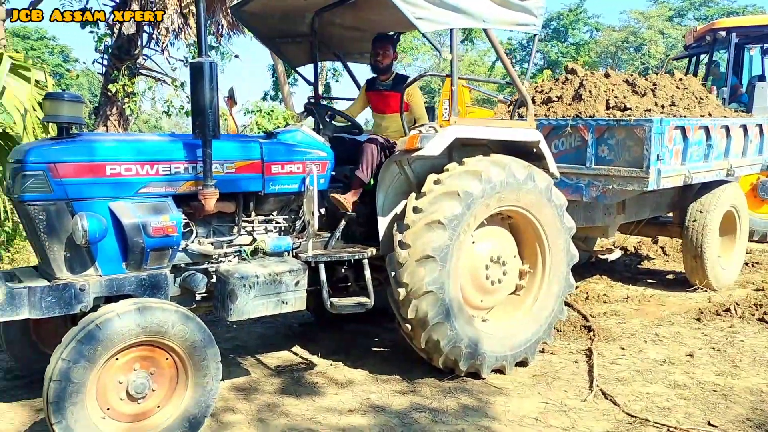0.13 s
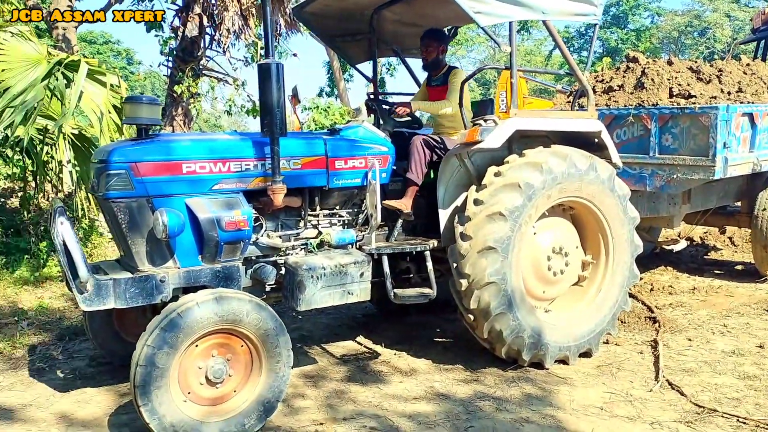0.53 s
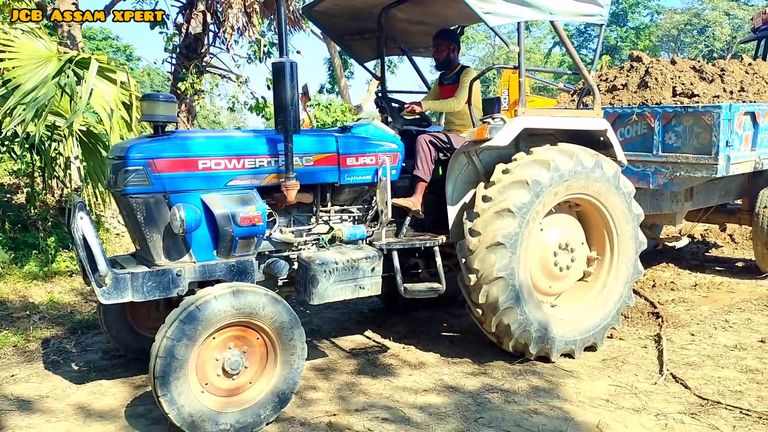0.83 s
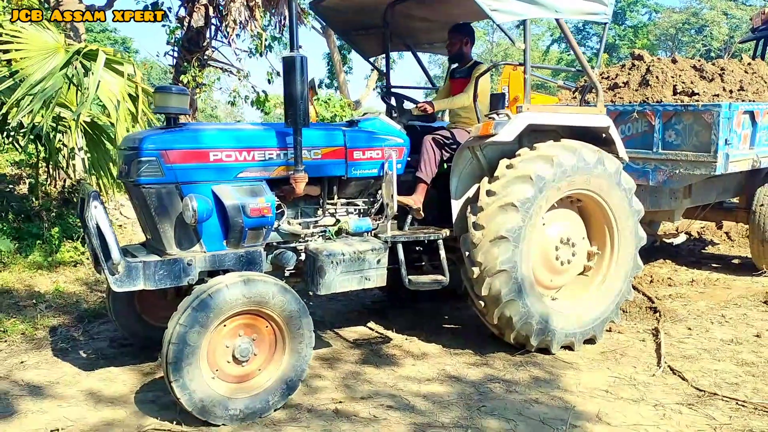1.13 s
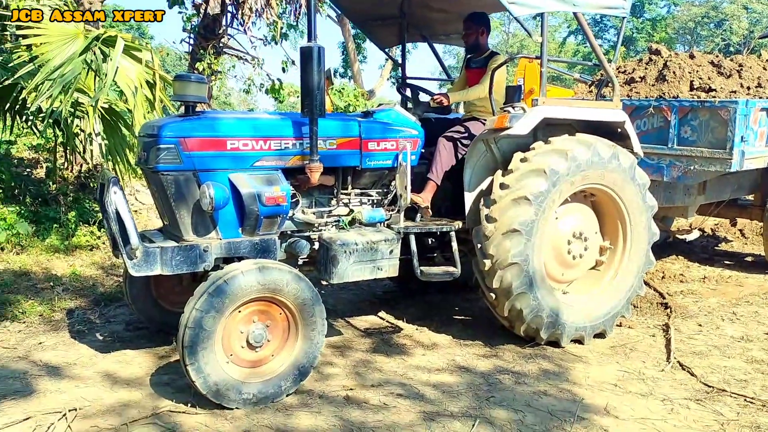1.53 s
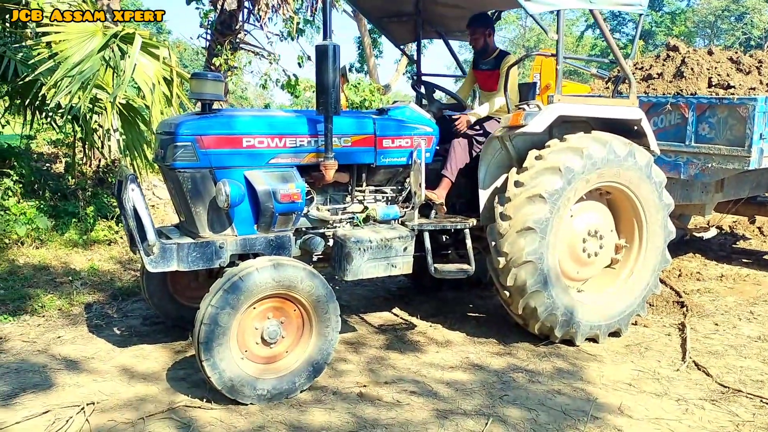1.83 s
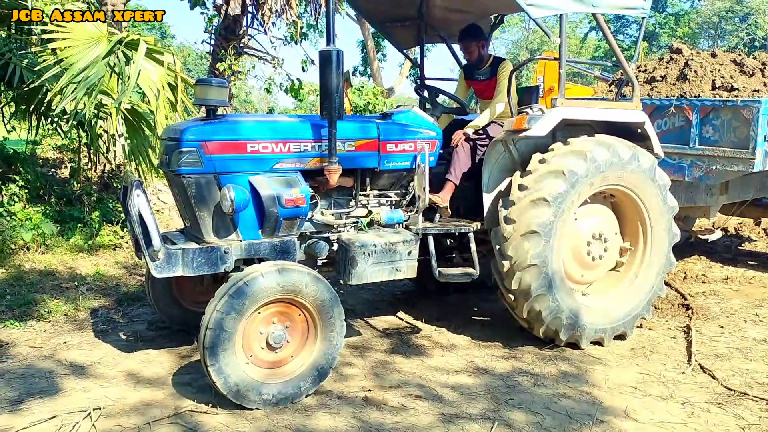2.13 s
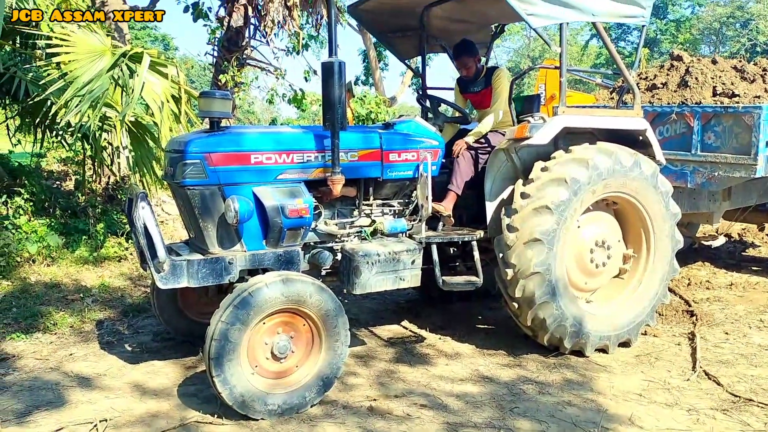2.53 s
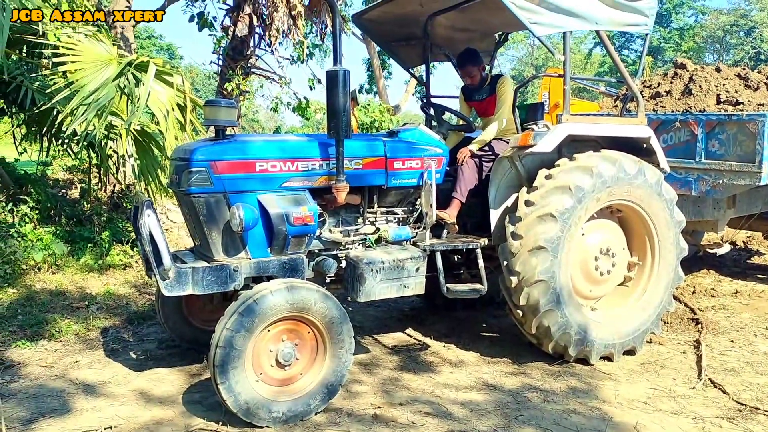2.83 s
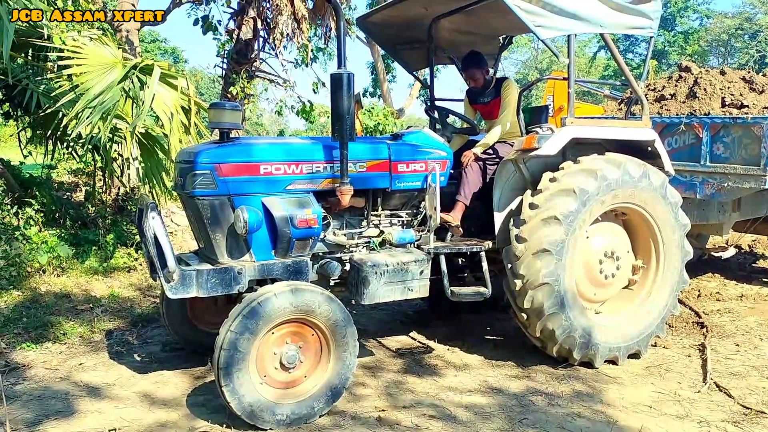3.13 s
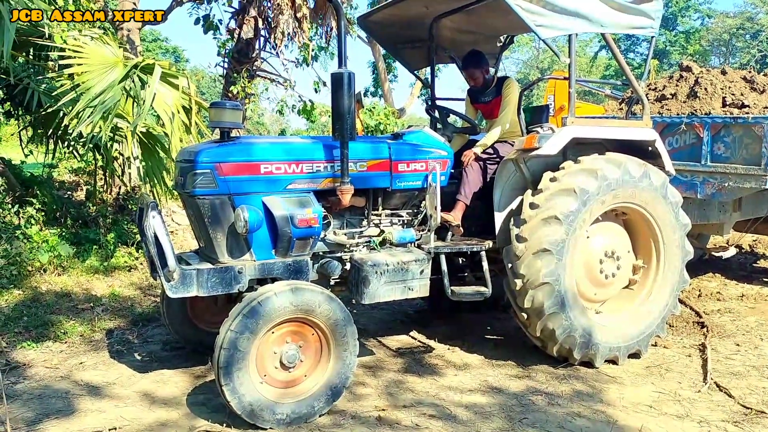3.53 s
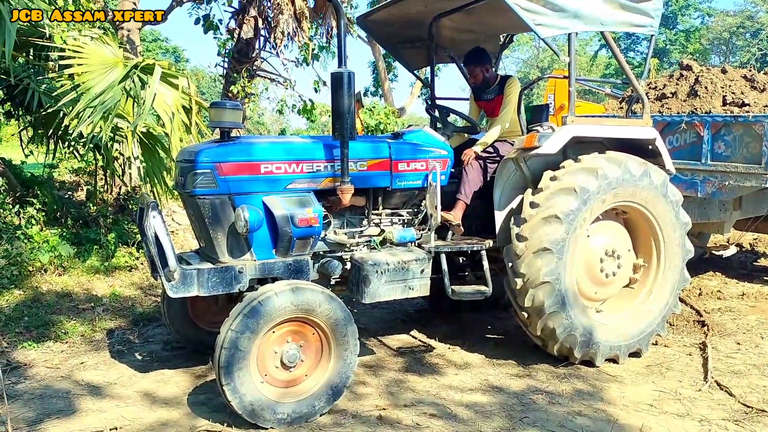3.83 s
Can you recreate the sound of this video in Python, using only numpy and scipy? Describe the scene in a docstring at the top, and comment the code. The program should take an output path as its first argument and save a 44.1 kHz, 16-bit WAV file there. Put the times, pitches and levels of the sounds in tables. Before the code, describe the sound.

A tractor engine starts with a clack and whine after shoes scuff on dirt.

```python
"""An open yard, with a low rumble, faint birds and thin distant whines. Shoes scuff over dry dirt and
leaves; then a diesel tractor a few metres away is started. The solenoid clacks, the pinion slams in
and the starter gears whine up and down against compression. The starter whirrs free as the engine
catches with hard knocks and exhaust puffs, then drops to a lumpy, clattering idle."""
import sys
import numpy as np
from scipy import signal
from scipy.fft import rfft, irfft
from scipy.io import wavfile
from scipy.ndimage import uniform_filter1d

SR = 44100
rng = np.random.default_rng(int(sys.argv[2]) if len(sys.argv) > 2 else 0)


def pcm_store(signal):
    """Save signal as 16-bit PCM."""
    levels = np.round(np.clip(np.atleast_2d(signal), -1, 1) * 32767)
    wavfile.write(sys.argv[1], SR, levels.astype(np.int16).T)


N = 176400

# tone of the outdoor bed: freq_hz, gain_db
YARD_EQ = [(20, -8), (45, 1), (75, -0.5), (125, -8), (250, -14), (430, -22.5), (700, -20), (950, -24),
           (1400, -23), (2200, -35.5), (5000, -44), (7200, -40.5), (9000, -51)]
# swell of its low end: time_s, gain_db
YARD_SWELL = [(0, -0.5), (.5, -1), (1.0, 1.5), (1.35, 1), (1.75, 3.5), (2.1, 1), (2.7, -1.5)]
# shoes on dirt: start_s, hold_s, crunch_db, grit_db, ring_hz
SCUFFS = [(0.084, 0.022, -50, -65.5, 664), (0.35, 0.019, -47.5, -55.5, 700),
          (0.373, 0.028, -45.5, -62, 722), (0.436, .012, -51, -64, 788), (0.536, .012, -61, -80, 647),
          (0.585, 0.014, -56, -65.5, 708), (.662, 0.045, -53.5, -55, 550), (0.702, 0.008, -47, -48, 717),
          (0.728, 0.047, -46.5, -51.5, 752), (0.809, 0.029, -41, -53, 475), (0.856, 0.018, -39.5, -57, 727),
          (0.892, 0.026, -48.5, -54, 710), (0.927, 0.028, -48, -54, 873), (0.967, 0.014, -41, -54, 743),
          (0.99, 0.058, -50, -69, 1055), (1.046, 0.015, -40, -60, 728), (1.073, 0.018, -37.5, -49.5, 687),
          (1.097, 0.14, -48, -70, 675), (1.165, 0.023, -44.5, -74, 722), (1.362, 0.024, -49, -80, 482),
          (1.396, 0.028, -46.5, -69, 694), (1.501, 0.031, -52, -59, 700), (1.57, 0.017, -49, -53.5, 455),
          (1.666, 0.043, -44.5, -49, 326), (2.37, 0.054, -65.5, -75, 509)]
# leafy rustle between scuffs: time_s, level_db
RUSTLE = [(0, -76.5), (.2, -69.5), (.33, -63.5), (.5, -79), (.65, -68.5), (.95, -63.5), (1.15, -60),
          (1.28, -85), (1.45, -60), (1.8, -91), (2.7, -73.5)]
# dull crunch of clods: freq_hz, gain_db
CRUNCH_EQ = [(80, -25), (200, -6.5), (330, -4), (500, -2.5), (720, 0), (950, -6.5), (1300, -8),
             (1900, -17.5), (2600, -23), (5000, -69)]
# crisp grit and leaves: freq_hz, gain_db
GRIT_EQ = [(900, -12), (1900, 12), (4000, 8), (6800, 3.5), (8800, -7), (16000, -10)]
# faint bird notes: start_s, hold_s, start_hz, end_hz, level_db
BIRDS = [(0.06, 0.099, 4420, 4000, -68.5), (0.586, 0.055, 3630, 3530, -68), (1.31, 0.035, 4250, 4200, -71)]
# distant whines, most of them sagging: start_s, hold_s, start_hz, end_hz, level_db
FAR_WHINES = [(1.52, 0.27, 1760, 1580, -65), (1.85, 0.5, 1860, 1733, -74), (1.9, 0.18, 1110, 1110, -63.5),
              (2.09, 0.17, 1110, 1050, -67), (2.28, 0.34, 1110, 1105, -66)]
# solenoid, then pinion: start_s, clank_db, splash_db
CLACKS = [(2.71, -29.5, -34.5), (2.7303, -26.5, -19), (2.75, -22.5, -37)]
# hard crack of struck iron: freq_hz, gain_db
CRACK_EQ = [(250, -27), (600, 0.5), (850, 5.5), (1100, -0.5), (1600, -0.5), (2400, -11), (3500, -10.5),
            (5500, -21.5), (7500, -21.5), (9000, -35), (16000, -43)]
# resonances of the engine block: freq_hz, width_hz, lift_db
BLOCK_MODES = [(124.5, 24, 2.5), (308.6, 11, 6), (340.8, 12.7, 17.5), (485, 16, 10), (650, 17, 8.5),
               (1372, 35, 10), (2170, 110, 2.5), (2524, 110, 8.5)]
# bright metal splash and exhaust hiss: freq_hz, gain_db
HISS_EQ = [(1000, 5), (2500, 6), (4000, 0.5), (5500, -0.5), (6400, -1.5), (7400, 7), (8800, -9.5),
           (12000, -5), (16000, -17)]
# starter gear whine: time_s, mesh_hz, level_db
GEAR_WHINE = [(2.73, 758.4, -26.5), (2.765, 797, -21.5), (2.792, 857, -35), (2.802, 821, -3.5),
              (2.814, 765, -19), (2.825, 912, -7.5), (2.837, 950.4, -20), (2.885, 1170, -28.5),
              (2.93, 1234, -21.5), (2.955, 1085, -20), (2.972, 945.6, -13), (2.992, 801, -7.5),
              (3.005, 754, -24), (3.05, 670.8, -42), (3.15, 702, -62)]
# harmonics 2 to 6 of the tooth mesh: gain_db
MESH_DB = [-9, -22, -12, -7.5, -11.5]
# grinding teeth: time_s, level_db
GRIND = [(2.725, -77), (2.74, -26.5), (2.80, -28), (2.86, -22), (2.93, -20.5), (2.99, -24), (3.04, -28),
         (3.13, -32), (3.22, -23.5), (3.32, -35.5), (3.45, -36)]
# tone of the grind: freq_hz, gain_db
GRIND_EQ = [(60, -16), (120, -0.5), (220, -0.5), (330, -3), (480, -9.5), (640, -5.5), (800, -5),
            (1100, -8.5), (1500, -7.5), (2200, -7.5), (3000, -13), (4600, -12.5), (6000, -16.5),
            (7200, -17), (8600, -26), (16000, -35.5)]
# resonances of the starter housing: freq_hz, width_hz, lift_db
HOUSING_MODES = [(760, 250, 10), (1420, 150, 10.5), (2020, 180, 5), (3370, 240, 6.5), (4130, 83, 9),
                 (5530, 160, 4)]
# body of the motor groan and block boom: freq_hz, gain_db
BOOM_EQ = [(50, -23.5), (110, 3), (200, 2.5), (330, -3), (500, -7.5), (700, 0), (950, -2), (1700, -48.5)]
# exhaust puffs: start_s, thump_hz, thump_db, hiss_db
PUFFS = [(2.765, 55.3, -33, -43), (2.921, 54.7, -26.5, -42), (3.121, 47.6, -19.5, -32.5),
         (3.21, 60, -60, -25), (3.246, 53, -14, -19.5), (3.33, 53, -12, -15), (3.401, 54.7, -9.5, -17.5),
         (3.464, 60.9, -12, -23), (3.587, 53.6, -20, -56), (3.647, 50, -21, -58), (3.715, 57, -15.5, -33),
         (3.841, 56, -15, -33), (3.901, 60.5, -15.5, -42)]
# starter running free: time_s, pitch_hz, level_db
WHIRR = [(3.03, 2300, -65), (3.07, 2750, -33), (3.11, 3400, -37.5), (3.16, 3700, -36), (3.26, 4000, -60)]
# gear and valve clatter: time_s, level_db
CLATTER = [(3.1, -33), (3.18, -35), (3.3, -24.5), (3.45, -21.5), (3.53, -29.5), (3.63, -29), (3.77, -27.5),
           (3.88, -24.5), (4.0, -32)]
# tone of the clatter: freq_hz, gain_db
CLATTER_EQ = [(20, -25), (50, -0.5), (110, 1), (200, -2.5), (330, -9.5), (450, -7), (700, -6),
              (1100, -18.5), (2200, -23), (3500, -33.5), (7300, -45), (9400, -57), (16000, -54)]
# combustion knocks: start_s, crack_db, boom_db
KNOCKS = [(3.161, -14.5, -20.5), (3.27, -16, -29), (3.349, -13.5, -24), (3.419, -15.5, -20),
          (3.48, -32.5, -45), (3.538, -34.5, -54), (3.604, -29, -42), (3.666, -21.5, -25),
          (3.733, -26, -34), (3.794, -21.5, -21.5), (3.856, -25, -26.5), (3.918, -28, -32),
          (3.977, -29.5, -33)]
# loose steel parts: pitch_hz
RATTLE_HZ = [921.6, 1180, 1330, 1435.5, 1570, 1865, 1994, 2120]
# stereo width: freq_hz, side_db
WIDTH_EQ = [(30, 0), (125, -25.5), (250, -17), (500, -20), (1000, -7.5), (2000, -7), (4000, -0.5),
            (16000, 0)]

CENTRE = np.array([[1], [0]])  # sources are built as mid, side


def undb(db):
    """Decibels to gain."""
    return 10 ** (np.asarray(db) / 20)


def unit(x):
    """Scale to rms 1."""
    return x / np.sqrt(np.mean(x ** 2))


def clock():
    """Time of every sample."""
    return np.arange(N) / SR


def curve(rows, column=1):
    """One column of a table, joined by straight lines in time."""
    rows = np.array(rows)
    return np.interp(clock(), rows[:, 0], rows[:, column])


def walk(rate_hz):
    """Smooth random wander with a spread of 1."""
    k = int(SR / rate_hz)
    return unit(uniform_filter1d(np.repeat(rng.standard_normal(N // k + 1), k), k)[:N])


def tone(hz, waver, rate_hz):
    """Sine with an unsteady pitch."""
    return np.sin(2 * np.pi * np.cumsum(hz * (1 + waver * walk(rate_hz))) / SR)


def response(points):
    """Causal frequency response through freq_hz, gain_db points."""
    hz, db = np.array(points).T
    gain = undb(np.interp(np.log(np.arange(N // 2 + 1) * SR / N + 1), np.log(hz), db))
    cepstrum = irfft(np.log(gain), N)
    cepstrum[1:N // 2] *= 2
    cepstrum[N // 2 + 1:] = 0
    return np.exp(rfft(cepstrum))


def convolve(x, ring):
    """Play a sound through an impulse response."""
    return signal.fftconvolve(np.atleast_2d(x), np.atleast_2d(ring), axes=1)[:, :N]


def colour(x, eq, modes=()):
    """Pass a sound through a body's broad EQ and ringing modes, keeping the power of white noise."""
    h, f = response(eq), np.arange(N // 2 + 1) * SR / N
    for hz, width, db in modes:
        h = h * (1 + (undb(db) - 1) * 1j * f * width / (hz ** 2 - f ** 2 + 1j * f * width))
    return convolve(x, irfft(h / np.sqrt(np.mean(abs(h) ** 2)), N)[:N // 20])


def grains(per_s, scatter_db):
    """Dense tiny impacts of uneven size, as mid and side."""
    size = (rng.random(N) < per_s / SR) * undb(scatter_db * np.minimum(rng.exponential(size=N), 4))
    return unit(size * rng.standard_normal((2, N)))


def burst(start_s, attack_s, hold_s, decay_s):
    """Envelope: linear rise, hold counted from the start, exponential release."""
    age = clock() - start_s
    return np.clip(age / attack_s, 0, 1) * np.exp(-np.clip((age - hold_s) / decay_s, 0, 20))


def yard():
    """A bed of outdoor rumble whose low end rises and falls."""
    bed = colour(rng.standard_normal((2, N)), YARD_EQ) * undb(-55)
    low = signal.sosfiltfilt(signal.butter(2, 250, fs=SR, output="sos"), bed)
    return bed - low + low * undb(curve(YARD_SWELL) + 0.5 * walk(11))


def scuffs():
    """Soles crush clods of dirt, each with a hollow ring; dry grit and leaves crackle on top."""
    crunch, grit, ring = 0, undb(curve(RUSTLE)), 0
    wavering_time = np.cumsum(1 + 0.078 * walk(400)) / SR
    for start, hold, crunch_db, grit_db, hz in SCUFFS:
        press = burst(start, 0.005, hold, 0.007)
        crunch += press * undb(crunch_db)
        grit += press * undb(grit_db)
        hollow = burst(start, 0.005, hold / 2, 0.024) * np.sin(2 * np.pi * hz * wavering_time)
        ring += undb(crunch_db + 1.5) * hollow
    clods = colour(crunch * grains(3000, scatter_db=-0.5), CRUNCH_EQ)
    leaves = colour(grit * grains(2500, scatter_db=-3.5), GRIT_EQ)
    return clods + leaves + CENTRE * ring


def distant_notes(notes, waver):
    """Birds or faraway whines: thin notes that slide and flutter."""
    out = 0
    for start, hold, start_hz, end_hz, db in notes:
        note = tone(curve([(start, start_hz), (start + hold, end_hz)]), waver, rate_hz=600)
        out += undb(db + 3.5 * walk(39.8)) * burst(start, 0.0078, hold, 0.015) * note
    return CENTRE * out


def solenoid():
    """Solenoid and pinion slam home: iron clanks with a bright metallic splash."""
    clank = sum(undb(db) * burst(s, 0.0037, 0.0063, 0.022) for s, db, _ in CLACKS)
    splash = sum(undb(db) * burst(s, 0.0017, 0.0047, 0.0082) for s, _, db in CLACKS)
    return (colour(clank * grains(6000, scatter_db=-1.5), CRACK_EQ, BLOCK_MODES)
            + colour(splash * grains(7200, scatter_db=2), HISS_EQ))


def starter_gears():
    """Gear teeth whine at the mesh rate, and rasp and grind inside the housing."""
    mesh_hz, whine_db = curve(GEAR_WHINE), curve(GEAR_WHINE, column=2)
    phase = 2 * np.pi * np.cumsum(mesh_hz * (1 + 0.0203 * walk(250))) / SR
    engaged = (clock() > GEAR_WHINE[0][0]) * (clock() < GEAR_WHINE[-1][0])
    whine = np.sin(phase) * undb(whine_db + 3 * walk(160)) * engaged
    slip_rad, top_hz = 0.45, max(hz for _, hz, _ in GEAR_WHINE)
    rasp = np.zeros((2, N))
    for channel in rasp:
        for harmonic, db in enumerate(MESH_DB, start=2):
            channel += undb(db) * np.sin(harmonic * (phase + slip_rad * walk(220)))
    rasp *= undb(-16 + 0.36 * whine_db) * engaged * mesh_hz / top_hz  # rides the whine's level and pitch
    teeth = unit(grains(12000, scatter_db=0.5) * (1 + 0.82 * np.cos(phase)))
    grind = teeth * undb(curve(GRIND)) * (clock() > GRIND[0][0])
    leftward = np.array([[1], [0.3]])
    return leftward * whine + colour(grind + rasp, GRIND_EQ, HOUSING_MODES)


def starter_motor():
    """The motor groans briefly as it takes the load."""
    hum = tone(128.5, waver=0.082, rate_hz=80)
    growl = colour(rng.standard_normal((2, N)), BOOM_EQ)
    return unit(hum + 0.94 * growl) * undb(-21.5) * burst(2.745, 0.02, 0.061, 0.013)


def exhaust(swell_s=0.016):
    """Each puff of gas swings the air in the silencer for a cycle or two, with a hiss at its front."""
    thump, hiss = 0, 0
    for start, hz, thump_db, hiss_db in PUFFS:
        age = np.maximum(clock() - start, 0)
        swell = (age / swell_s * np.exp(1 - age / swell_s)) ** 2.9
        thump -= undb(thump_db) * swell * np.sin(2 * np.pi * hz * age)
        hiss += undb(hiss_db) * burst(start, 0.0043, 0.0083, 0.0077)
    return CENTRE * thump + colour(hiss * grains(14000, scatter_db=-3.5), HISS_EQ)


def starter_whirr(zing_hz=6560):
    """The unloaded starter spins up with a rough whirr; the pinion rings along in a thin zing."""
    whirr = np.array([tone(curve(WHIRR), waver=0.042, rate_hz=900) for _ in range(2)])
    zing = np.array([tone(zing_hz, waver=0.042, rate_hz=900) for _ in range(2)])
    free = (clock() > WHIRR[0][0]) * (clock() < WHIRR[-1][0])
    return (whirr + undb(-1.5) * zing) * undb(curve(WHIRR, column=2)) * free


def engine():
    """Each firing cracks and booms in the iron block; gears and valves clatter underneath."""
    crack, boom = 0, 0
    for start, crack_db, boom_db in KNOCKS:
        contact = undb(-1) * burst(start, 0.0013, 0.0018, 0.0013)  # first metal-to-metal hit
        crack += undb(crack_db) * (contact + burst(start, 0.0082, 0.0072, 0.012))
        boom += undb(boom_db) * burst(start, 0.0068, 0.026, 0.03)
    clatter = undb(curve(CLATTER) + 1.6 * walk(70)) * (clock() > CLATTER[0][0])
    return (colour(crack * grains(2500, scatter_db=1), CRACK_EQ, BLOCK_MODES)
            + colour(boom * grains(6000, scatter_db=1), BOOM_EQ, BLOCK_MODES)
            + rattle(crack)
            + colour(clatter * grains(4000, scatter_db=-0.5), CLATTER_EQ))


def rattle(shake, ring_s=0.007):
    """Loose steel parts chatter while the block shakes, each ringing at its own pitch."""
    age = clock()[:N // 40]
    chatter = 0
    for hz in RATTLE_HZ:
        ping = np.sin(2 * np.pi * hz * age) * np.exp(-age / ring_s)
        chatter += convolve(shake * grains(400, scatter_db=-2), ping)
    return undb(-6.5) * chatter / np.sqrt(len(RATTLE_HZ) * ring_s * SR / 4)


def panels(x, ring_s=0.0035):
    """Sheet metal round the engine adds a dense, very short ring."""
    ring = (rng.standard_normal((2, N)) * burst(0, ring_s / 10, 0, ring_s))[:, :N // 100]
    ring = signal.sosfilt(signal.butter(2, 1800, "high", fs=SR, output="sos"), ring)
    ring /= np.sqrt(np.sum(ring ** 2) / 2)
    return x + undb(-5.5) * convolve(x, ring)


def echo(mid, t60_s=0.34):
    """Trees and a trailer scatter a short, bright tail to left and right."""
    tail = rng.standard_normal((2, N)) * burst(0.006, 0.024, 0.021, t60_s / np.log(1000))
    tail = colour(tail, [(60, -38), (300, -3), (900, 3.5), (2500, 3), (7000, -1), (16000, 6.5)])
    tail = tail[:, :N // 4]
    return convolve(mid, tail / np.sqrt(np.sum(tail ** 2) / 2))


def scene():
    """The mix: narrow in the low mids, wide in the treble, with a short outdoor echo."""
    mix = scuffs()
    mix += panels(solenoid() + starter_gears() + starter_motor() + engine() + exhaust())
    mix += starter_whirr() + yard()
    mix += distant_notes(BIRDS, waver=0.05) + distant_notes(FAR_WHINES, waver=0.045)
    mid, side = mix
    side = signal.fftconvolve(side, irfft(response(WIDTH_EQ), N)[:N // 100])[:N]
    metallic_band = signal.lfilter(*signal.iirpeak(2300, 1, fs=SR), mid)
    side -= undb(-15) * metallic_band  # leans to the right
    return np.array([mid + side, mid - side]) + undb(-9) * echo(mid)


def record(dry):
    """Soft saturation rounds the highest peaks and a steep low-pass cuts the top."""
    return signal.sosfilt(signal.ellip(10, 0.2, 80, 16100, fs=SR, output="sos"), np.tanh(dry))


dry = scene()
out = record(dry)
pcm_store(out)
```